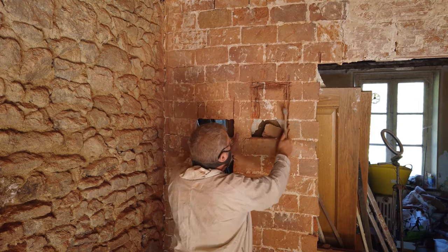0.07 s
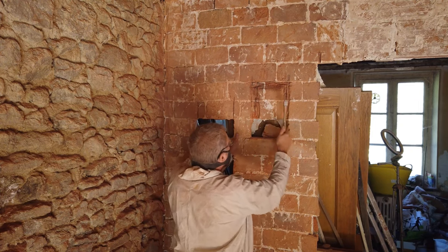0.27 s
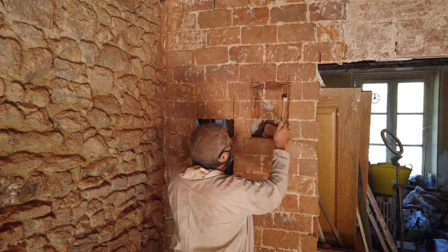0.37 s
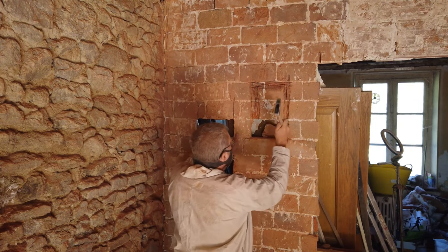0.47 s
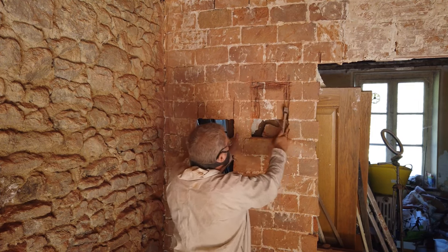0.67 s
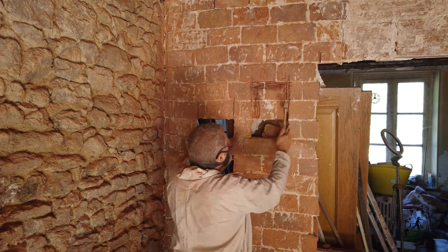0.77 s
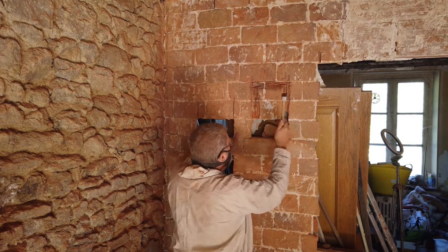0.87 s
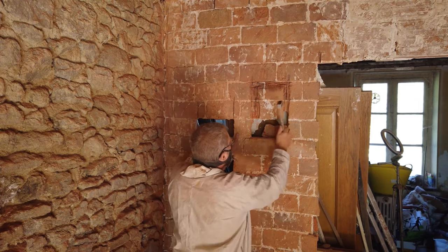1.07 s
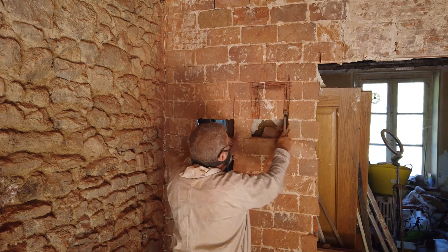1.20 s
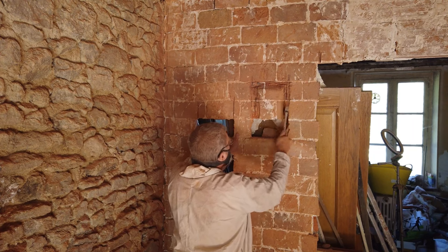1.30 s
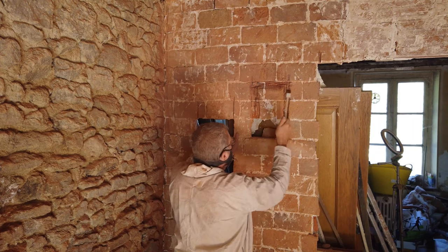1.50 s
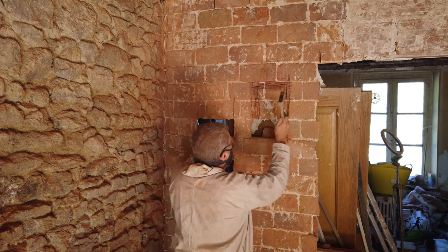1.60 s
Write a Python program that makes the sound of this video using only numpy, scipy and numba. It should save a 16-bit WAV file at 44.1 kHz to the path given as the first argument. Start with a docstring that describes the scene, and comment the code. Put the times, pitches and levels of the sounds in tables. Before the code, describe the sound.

Three thudding pick blows chop into brick in a bare room, small debris falling.

```python
"""In a bare stone room, a hand pick chops an opening in a brick partition a few metres away.
A dull tail of an earlier sound dies away; two blows thud into the wall and a third breaks brick away,
a shard tinking after it. Each blow is a steel tick, a crunch, a hollow knock and the boom of the wall's
modes, then a weaker after-knock. The blade scrapes and clinks on hard brick, and crumbs trickle down.
The room reverberates over a low rumble, and a limiter flattens the blows."""
import sys
import numpy as np
from scipy import signal
from scipy.fft import rfft, irfft
from scipy.io import wavfile
from numba import njit

SR = 44100
rng = np.random.default_rng(int(sys.argv[2]) if len(sys.argv) > 2 else 0)


def int16_out(signal):
    """Quantize to a 16-bit WAV file."""
    q = np.round(np.clip(np.atleast_2d(signal).T, -1, 1) * 32767)
    wavfile.write(sys.argv[1], SR, q.astype(np.int16))


N = 72765

# blows and after-knocks: onset t/s, thud level/dB, boom level/dB, knock level/dB, knock f/Hz,
# thud build-up t/s, crunch level/dB, crunch decay t/s, tick level/dB, tick f/Hz
BLOWS = [(0.2034, 1, 4, -6, 406, 0.0021, -4, 0.0097, 0.5, 7930),
         (0.279, -17, -15, -12.5, 220, 0.0022, -30, .005, -40, 8360),
         (0.6854, -5.5, 0, 6.5, 426, 0.0019, 4, 0.0064, -4, 8700),
         (0.732, -7, -9, -8.5, 570, 0.0031, -3, 0.0088, -26, 8050),
         (1.2316, -14, -7.5, -11, 926, .014, 1.5, 0.032, -2.5, 7840),
         (1.342, -23, -13.5, -15, 609, 0.005, -17.5, 0.0078, -19, 8100)]
GRAINS_PER_S, PUSH_LAG_S, TOP_HZ = 4000, 0.0011, 16000
LN_1000 = np.log(1000)  # time constants in a decay of 60 dB


def amp(db):
    """Amplitude ratio of a level in decibels."""
    return 10 ** (np.asarray(db) / 20)


def at(points, hz):
    """Interpolation of a table on a log-frequency axis."""
    f, values = np.array(points, float).T
    return np.interp(np.log(np.maximum(hz, 1)), np.log(f), values)


def freqs():
    """Frequencies of the Fourier bins, f/Hz."""
    return np.arange(N // 2 + 1) * SR / N


def shape(x, gain):
    """Zero-phase filtering by a gain per frequency; white noise keeps its power."""
    return irfft(rfft(x) * gain / np.sqrt(np.mean(gain ** 2)), N)


def colour(x, points):
    """Minimum-phase filtering to a given spectrum; white noise keeps its power."""
    gain = amp(at(points, freqs()))
    cepstrum = irfft(np.log(gain / np.sqrt(np.mean(gain ** 2))), N)
    cepstrum[1:N // 2] *= 2  # folding onto positive time makes the filter causal
    cepstrum[N // 2:] = 0
    response = irfft(np.exp(rfft(cepstrum)), N)[:N // 10]
    return signal.fftconvolve(x, response)[:N]


def resonate(x, hz, width_hz):
    """Forced response of a damped resonator; white noise keeps its power."""
    b, a = signal.iirpeak(hz, hz / width_hz, fs=SR)
    return signal.lfilter(b, a, x) * np.sqrt(SR / np.pi / width_hz)


def since(start):
    """Time elapsed after an onset, t/s; zero before it."""
    return np.maximum(np.arange(N) / SR - start, 0)


def burst(start, rise, fall):
    """Transient envelope: quick rise and exponential decay."""
    t = since(start)
    return (1 - np.exp(-t / rise)) * np.exp(-t / fall)


def stroke(start, length, rise=0.005, release=0.003):
    """Sustained envelope: attack, hold and exponential release."""
    return (1 - np.exp(-since(start) / rise)) * np.exp(-since(start + length) / release)


def grains(rate, spread_db=4):
    """Shot noise: random clicks of uneven size, rms 1."""
    clicks = (rng.random(N) < rate / SR) * rng.choice([-1, 1], N)
    clicks = clicks * amp(spread_db * np.minimum(rng.exponential(size=N), 4))
    return clicks / clicks.std()


def spread(mid, side):
    """Spatial coherence: two close points hear alike in the bass and differ in the treble."""
    # side relative to mid: f/Hz, level/dB
    side_levels = [(60, -43), (250, -23), (500, -20), (1000, -15), (2000, -2), (10000, -4)]
    side = irfft(rfft(side) * amp(at(side_levels, freqs())), N)
    return np.array([mid + side, mid - side])


def room(x, direct_db=-10.5, echo_db=1.5, rise_s=0.0027):
    """Reverberation: direct sound plus dense reflections from masonry; the lows last longest."""
    # reverberation time: f/Hz, T60/s
    decay_times = [(60, 0.5), (160, 0.57), (420, 0.4026), (1100, 0.4536), (2900, 0.32), (7700, 0.26),
                   (16000, 0.17)]
    tails = np.zeros((2, N))
    spectra = rfft(rng.standard_normal((2, N)))
    octave = np.log2(np.clip(freqs(), 40, 20480) / 40)
    for k in range(10):
        band = irfft(spectra * np.maximum(1 - abs(octave - k), 0), N)
        envelope = burst(0, rise_s, at(decay_times, 40 * 2 ** k) / LN_1000)
        tails += band * envelope / np.sqrt(np.sum(envelope ** 2))
    echo = signal.fftconvolve(spread(*tails), x[None], axes=1)[:, :N]
    return amp(direct_db) * x + amp(echo_db) * echo


def rumble(gain_db=-36.5):
    """Stationary noise: the low rumble of the building."""
    # rumble spectrum: f/Hz, level/dB
    spectrum = [(20, -5), (42, 0), (70, -16), (200, -22), (400, -29), (1000, -37), (3000, -47), (6000, -57),
                (16000, -58)]
    noise = rng.standard_normal((2, N))
    return amp(gain_db) * spread(*shape(noise, amp(at(spectrum, freqs()))))


def crumbs(gain_db=-46.5, trickle_db=-19, sizes=12, per_s=1200, width_hz=900):
    """Random impacts: mortar falls in showers over a thin trickle, each size pinging at its own pitch."""
    # showers of crumbs: onset t/s, duration t/s, level/dB
    showers = [(.001, 0.0052, 10.5), (0.245, 0.1, -11.5), (0.367, 0.01, -3.5), (0.442, 0.017, -14),
               (0.81, 0.2, -13.5), (1.042, 0.0057, 6), (1.345, 0.009, 16), (1.398, 0.018, 6.5),
               (1.485, 0.0095, 6.5), (1.527, 0.028, 1.5), (1.611, 0.015, 7.5)]
    # spectrum of the patter: f/Hz, level/dB
    spectrum = [(500, -31), (2500, 3.5), (5500, -10), (8000, -4.5), (10000, 4.5), (12500, -8.5),
                (16000, -13)]
    flow = amp(trickle_db) + sum(amp(db) * stroke(start, length) for start, length, db in showers)
    pitches = (np.arange(sizes) + 1 + rng.random(sizes)) * TOP_HZ / (sizes + 2)
    pings = sum(resonate(grains(per_s / sizes) * flow, hz, width_hz) for hz in pitches)
    return amp(gain_db) * colour(pings / np.sqrt(sizes), spectrum)


def tail_scrapes_and_tink(gain_db=-34, ring_width_hz=190, bump_hz=330):
    """Noise-driven resonance: a dull opening tail, blade scrapes and the high tink of a brick shard."""
    # tail of an earlier sound (at 0.004 s), shard (at 1.264 s) and scrapes (the rest): onset t/s,
    # duration t/s, grit level/dB, bump level/dB, ring f/Hz, ring level/dB relative to the grit
    events = [(.004, 0.013, -9, 0, 2320, 0), (0.111, 0.0077, -10.5, -29, 1523, 13),
              (0.543, 0.022, -13, -0.5, 500, 8), (0.579, 0.21, -15.5, -37, 1540, 8.5),
              (0.954, 0.08, -14, -0.5, 1260, -20), (1.034, 0.019, 3, -5, 1680, -5.5),
              (1.065, 0.011, -4.5, -9, 1266, 5.5), (1.218, 0.015, -6.5, -40, 2880, 24.5),
              (1.264, 0.013, 1, -18, 6400, 10), (1.613, 0.011, -25.5, -47, 2120, 15)]
    # spectrum of the grit: f/Hz, level/dB
    spectrum = [(100, -3.5), (350, -0.5), (800, 1.5), (1500, -2), (3000, -3), (4500, -19.5), (7000, -35),
                (16000, -29)]
    grit, bump, ring = np.zeros((3, N))
    for start, length, db, bump_db, hz, ring_db in events:
        drive = grains(GRAINS_PER_S) * stroke(start, length)
        grit += amp(db) * drive
        bump += amp(bump_db) * drive
        ring += amp(db + ring_db) * resonate(drive, hz, ring_width_hz) / 2
    lowpass = 1 / np.hypot(1, (freqs() / bump_hz / 2) ** 2)
    bump = resonate(shape(bump, lowpass), bump_hz, bump_hz / 2) * np.sqrt(bump_hz / SR)
    return amp(gain_db) * (colour(grit, spectrum) + bump + ring)


def ticks(gain_db=-17, decay_s=0.0034, width_hz=2100):
    """Hard contact: the steel tip meets brick and excites a bright, heavily damped resonance."""
    out = np.zeros(N)
    for start, *_, db, hz in BLOWS:
        contact = rng.standard_normal(N) * burst(start, 0.0001, decay_s)
        out += amp(db) * resonate(contact, hz, width_hz)
    return amp(gain_db) * out


def crunch(gain_db=-10):
    """Brittle fracture: brick crushes into grains under the blade, each one a click."""
    # fracture spectrum: f/Hz, level/dB
    spectrum = [(100, -10.5), (400, 0.5), (950, -0.5), (1600, -6.5), (2800, -7.5), (4000, -17), (6000, -22),
                (8500, -17.5), (12000, -25), (16000, -31.5)]
    crush = sum(amp(db) * burst(start, 0.00063, decay) for start, *_, db, decay, _, _ in BLOWS)
    return amp(gain_db) * colour(grains(GRAINS_PER_S) * crush, spectrum)


def knocks(gain_db=-6.5, decay_s=0.0071):
    """Damped oscillation: the struck brick rocks for a few cycles, a hollow knock."""
    out = np.zeros(N)
    for start, _, _, db, hz, *_ in BLOWS:
        out += amp(db) * np.sin(2 * np.pi * hz * since(start)) * burst(start, PUSH_LAG_S, decay_s)
    return amp(gain_db) * out


def thuds(gain_db=-2.5, decay_s=0.018):
    """Forced response: the masonry takes the push just after the tick, a burst of low noise."""
    # thud spectrum: f/Hz, level/dB
    spectrum = [(25, -24.5), (55, 0), (90, 3.5), (200, 1), (450, -4.5), (800, -12.5), (1500, -20),
                (3000, -27.5), (8000, -60)]
    push = sum(amp(db) * stroke(start + PUSH_LAG_S, 2 * build, build / 2, decay_s)
               for start, db, _, _, _, build, *_ in BLOWS)
    return amp(gain_db) * colour(rng.standard_normal(N) * push, spectrum)


def boom(gain_db=-10.5, scatter_db=1, detune=0.0042, waver_db=2, coupling_db=5, rise_cycles=0.99):
    """Free vibration: the wall rings on in its modes, the lowest swelling last; each level wavers."""
    # modes of the wall: f/Hz, level/dB, T60/s
    modes = [(80.63, 1, 0.42), (86.35, -1.5, 0.57), (112.46, -5, 0.58), (164, -3.5, 0.33),
             (214.4, -3.5, 0.44), (239, -5.5, 0.38), (383.7, -8, 0.38), (417.2, -9.5, 0.42),
             (473, -13, 0.13), (533, -14, 0.3), (558.4, -10, 0.34), (682, -6, 0.16), (810, -10, 0.26),
             (990, -14.5, 0.22)]
    out = np.zeros(N)
    for onset, _, boom_db, _, knock_hz, build, *_ in BLOWS:
        start = onset + 2 * build
        for (hz, db, t60), (size, tune) in zip(modes, rng.standard_normal((len(modes), 2))):
            # the struck brick favours wall modes near its own pitch
            boost = coupling_db * np.exp(-(10 * np.log(hz / knock_hz)) ** 2 / 2)
            waver = waver_db * np.interp(np.arange(N), np.linspace(0, N, 60), rng.standard_normal(60))
            level = boom_db + db + boost + scatter_db * size + waver
            wave = np.sin(2 * np.pi * hz * (1 + detune * tune) * since(start))
            out += amp(level) * wave * burst(start, rise_cycles / hz, t60 / LN_1000)
    return amp(gain_db) * out


def clinks(gain_db=-17, chatter_s=0.0032):
    """Modal ringing: brief chatter excites the blade, which hand and brick damp."""
    # contacts with hard brick: t/s, level/dB
    contacts = [(0.6893, -9), (0.736, -21), (1.041, -31), (1.2319, -1), (1.597, -22)]
    # modes of the blade: f/Hz, level/dB, T60/s
    modes = [(2390, -3.5, 0.05), (2497, -3.5, 0.026), (2712, 4, 0.018)]
    jolts = sum(amp(db) * burst(start, 0.00044, chatter_s) for start, db in contacts)
    chatter = rng.standard_normal(N) * jolts
    ring = sum(amp(db) * resonate(chatter, hz, LN_1000 / (np.pi * t60)) * np.sqrt(t60 / chatter_s)
               for hz, db, t60 in modes)
    return amp(gain_db) * ring / 2


@njit
def follow(x, attack, release):
    """Envelope detection: a one-pole smoother with separate rates for rise and fall."""
    out, envelope = np.empty(len(x)), 0.
    for i in range(len(x)):
        envelope += (x[i] - envelope) * (attack if x[i] > envelope else release)
        out[i] = envelope
    return out


def scene(spots=3):
    """Superposition: brick breaks at several spots, each with its own paths through the room."""
    broken = sum(room(crunch() + thuds()) for _ in range(spots)) / np.sqrt(spots)
    tip, gritty, bits = ticks(), tail_scrapes_and_tink(), crumbs()
    struck = knocks() + clinks()
    reverberant = broken + room(tip + bits) + room(gritty + struck)
    near = tip + amp(-2.5) * gritty + amp(-10) * bits + amp(-4) * struck  # the tip faces the listener
    direct = np.array([near, np.pad(near, (1, 0))[:N]])  # arrives on the left one sample sooner
    return reverberant + direct + boom() + rumble()


def record(dry, drive_db=3, limit_db=5.5, attack_s=0.003, release_s=0.035, knee=4):
    """Dynamic compression: a limiter ducks the blows, saturation rounds the peaks, the top is cut."""
    x = dry * amp(drive_db)
    envelope = follow(abs(x).max(axis=0), 1 / (attack_s * SR), 1 / (release_s * SR))
    x = x / np.maximum(envelope / amp(limit_db), 1)
    x = x / (1 + abs(x) ** knee) ** (1 / knee)
    lowpass = signal.ellip(10, 0.2, 80, TOP_HZ, fs=SR, output="sos")
    return signal.sosfilt(lowpass, x)


dry = scene()
out = record(dry)
int16_out(out)
```